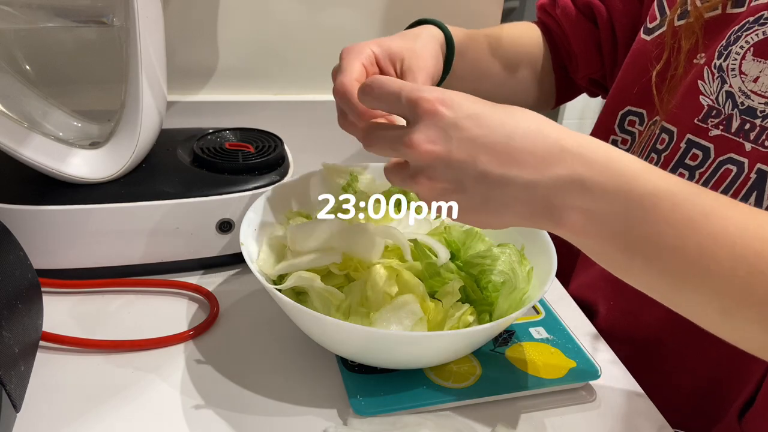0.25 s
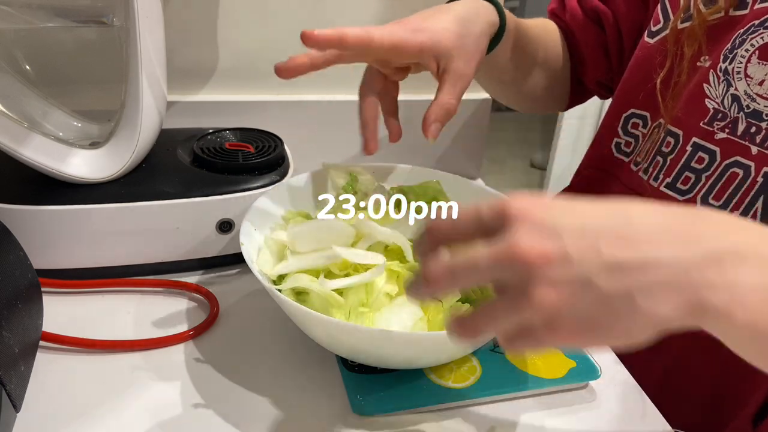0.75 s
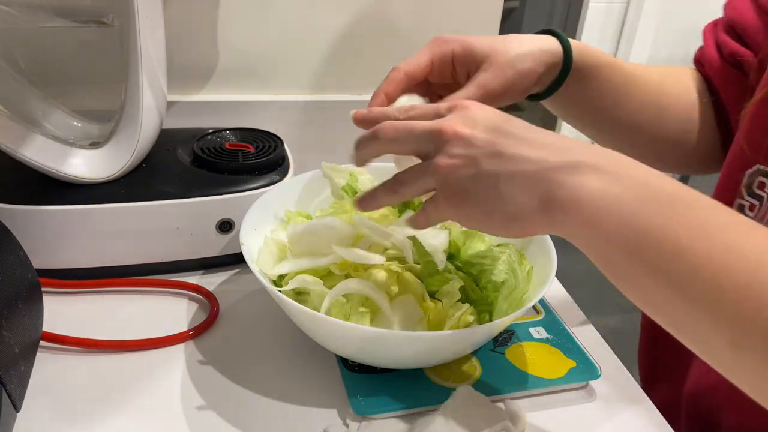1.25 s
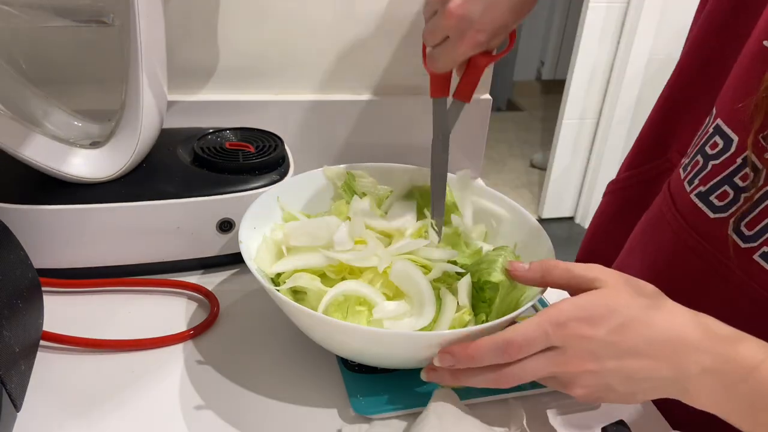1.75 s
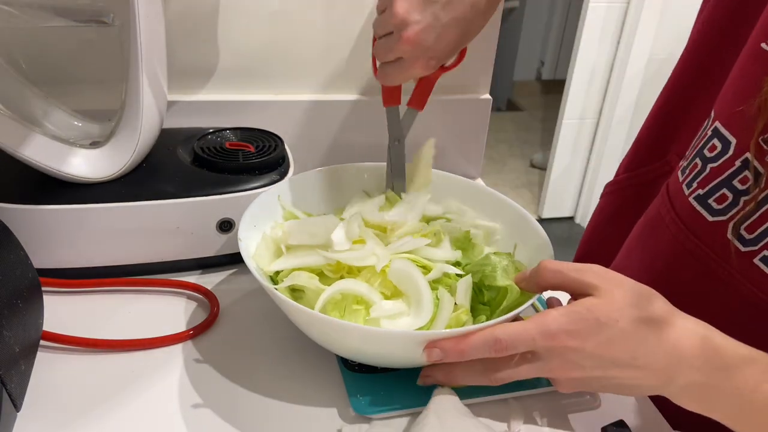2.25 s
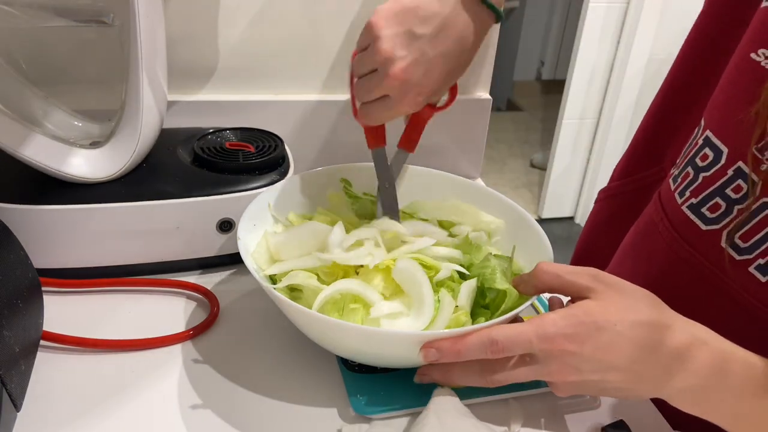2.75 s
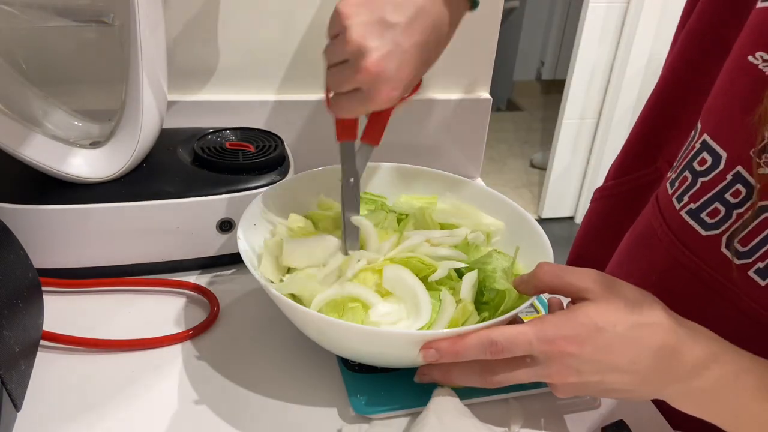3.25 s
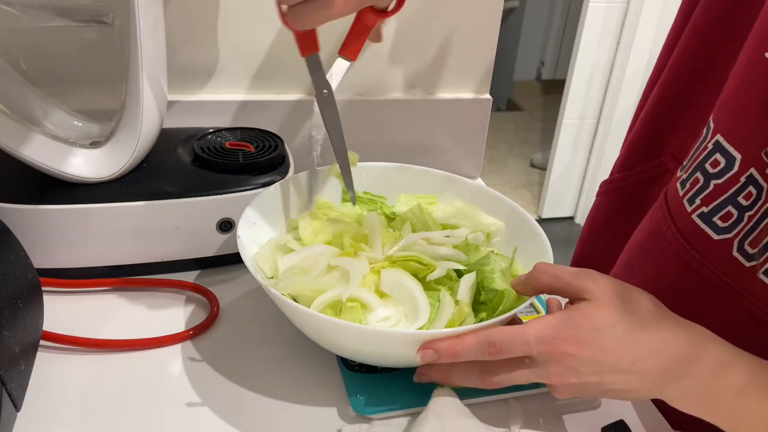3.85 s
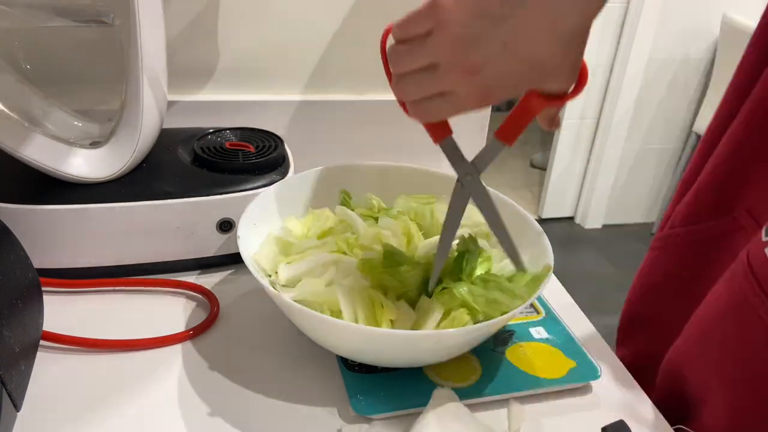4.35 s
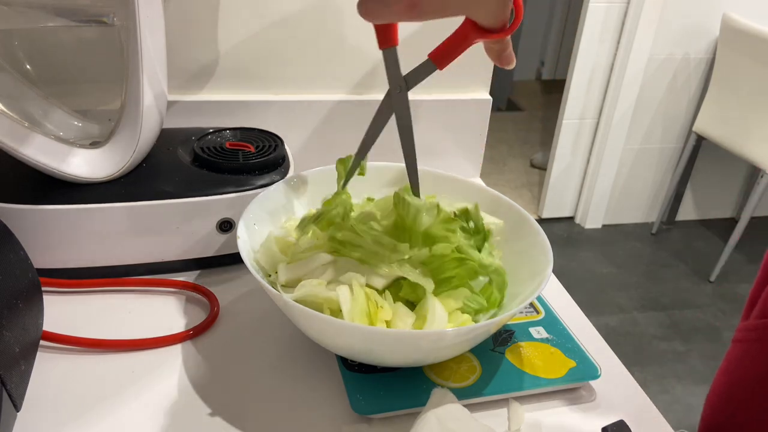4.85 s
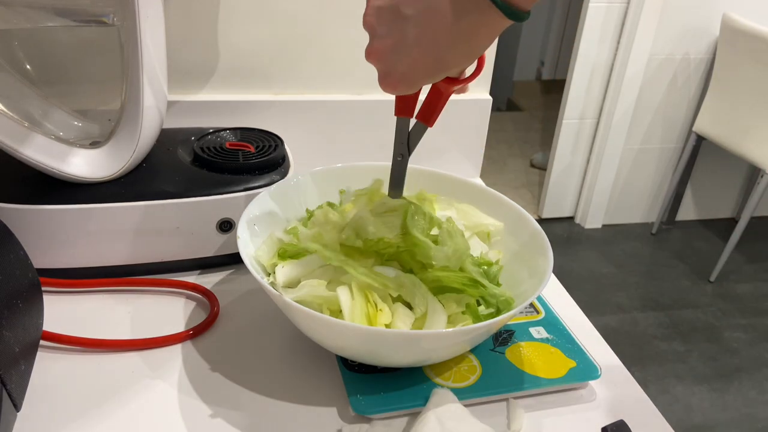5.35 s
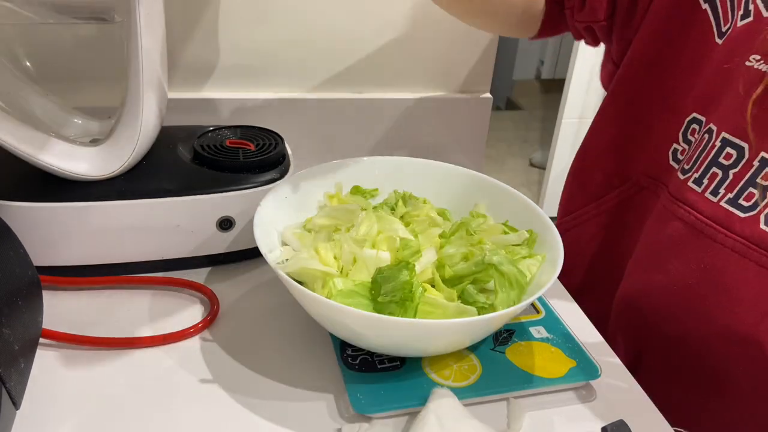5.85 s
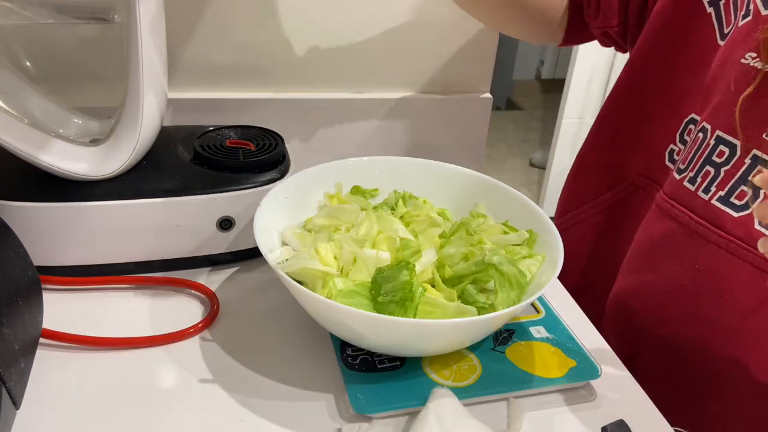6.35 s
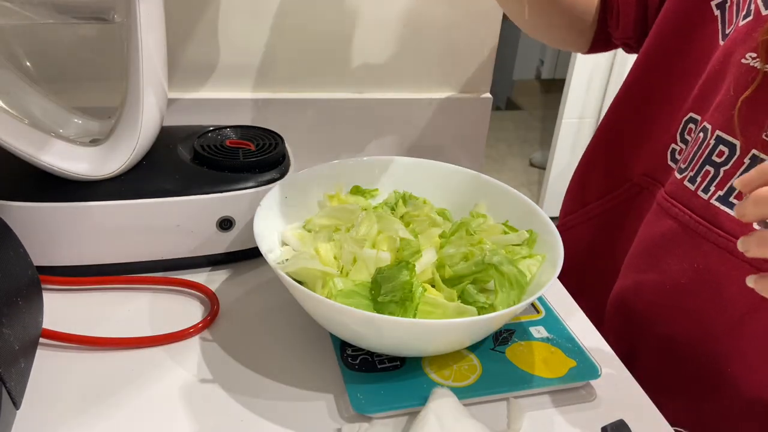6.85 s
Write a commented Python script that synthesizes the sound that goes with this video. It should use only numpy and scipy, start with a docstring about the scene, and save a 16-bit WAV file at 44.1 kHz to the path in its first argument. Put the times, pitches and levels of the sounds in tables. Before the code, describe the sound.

Close to a salad bowl, soft cracks of onion being pulled apart give way to loud scissor snips through crisp lettuce, about two a second, with scraping steel, snapping ribs and a short kitchen echo. A salt shaker then rattles six times, spraying crystals with a thin ring. An extractor fan hums behind everything, and the sound cuts out for an instant four times.

```python
"""A small, hard kitchen: stereo microphones close to a salad bowl, an extractor fan droning behind.
Fingers crack onion layers apart. Scissors chop lettuce in the bowl: cells crunch, ribs break, the
blades rasp and clack shut, and the room rings after every snip. Last, six shakes of salt spray
crystals and ring the shaker. The sound drops out for an instant four times."""
import sys
import numpy as np
from scipy import signal
from scipy.fft import rfft, irfft
from scipy.io import wavfile
from scipy.ndimage import uniform_filter1d, map_coordinates

SR = 44100
rng = np.random.default_rng(int(sys.argv[2]) if len(sys.argv) > 2 else 0)


def wrap_up_sound(samples):
    """Save the sound to the file named by the first command line argument, as 16-bit audio."""
    columns = np.atleast_2d(samples).T
    # keep every value between -1 and 1, then stretch to whole-number steps
    tamed = np.clip(columns, -1, 1)
    steps = np.round(tamed * 32767).astype(np.int16)
    wavfile.write(sys.argv[1], SR, steps)


N = 313110
TIME = np.arange(N) / SR
FFT_SIZE = 2 ** 19
BINS = np.maximum(np.fft.rfftfreq(FFT_SIZE, 1 / SR), 1)


def undb(db):
    """Decibels to gain."""
    return 10 ** (np.asarray(db) / 20)


def unit(x):
    """Scale to rms 1."""
    return x / np.sqrt(np.mean(x ** 2))


def along(points, hz=BINS):
    """Read (freq_hz, value) points on a log-frequency axis."""
    freqs, values = np.transpose(points)
    return np.interp(np.log(hz), np.log(freqs), values)


def response(points=((20, -60), (20000, -60)), peaks=()):
    """Gain of a smooth spectrum with resonances standing on it."""
    power = undb(along(points)) ** 2
    for hz, width, db in peaks:
        power = power + undb(db) ** 2 / (1 + ((BINS - hz) / width) ** 2) ** 2
    return np.sqrt(power)


def shape(x, gain):
    """Colour a sound with a minimum-phase filter, its gain curve scaled to rms 1."""
    cepstrum = irfft(np.log(unit(gain)))[:FFT_SIZE // 2]
    cepstrum[1:] *= 2
    return irfft(rfft(x, FFT_SIZE) * np.exp(rfft(cepstrum, FFT_SIZE)))[..., :x.shape[-1]]


def tilt(x, db_per_octave):
    """Brighten or dull a sound about 4 kHz; flat below 1 kHz."""
    size = 2 * x.shape[-1]
    hz = np.maximum(np.fft.rfftfreq(size, 1 / SR), 1000)
    gain = undb(db_per_octave * np.log2(hz / 4000))
    return irfft(rfft(x, size) * gain)[..., :size // 2]


def add(track, start_s, sound):
    """Mix a short sound into a track."""
    i = max(int(start_s * SR), 0)
    track[..., i:i + sound.shape[-1]] += sound[..., :N - i]


def decay(t, t60_s):
    """Envelope that falls 60 dB in t60_s."""
    return np.exp(-np.log(1000) * t / t60_s)


def gate(age, length_s, attack_s, release_s):
    """Envelope that rises at age 0, holds for a length and dies away."""
    return (1 - np.exp(-np.maximum(age, 0) / attack_s)) * np.exp(-np.maximum(age - length_s, 0) / release_s)


def swell(age, half_s):
    """Soft rise and fall around age 0."""
    return np.exp(-np.minimum(abs(age / half_s), 10) ** 2 / 2)


def surge(age, rise_s=0.01):
    """Envelope of a handful of crystals landing: quick rise to 1, slower fall."""
    u = np.clip(age / rise_s, 0, 20)
    return u * np.exp(1 - u)


def wander(rate):
    """Random course with so many turns a second; spread near 1."""
    return np.interp(TIME * rate, np.arange(N), rng.standard_normal(N))


def grains(rate, spread_db, size=N):
    """Tiny clicks of uneven strength at random moments, about rate a second; rms 1."""
    strengths = undb(spread_db * np.minimum(rng.exponential(size=size), 4))
    return unit(strengths * rng.choice([-1, 1], size) * (rng.random(size) < rate / SR) + 1e-9)


def stereo_grains(rate, spread_db, size=N):
    """Separate clicks for each microphone."""
    return np.array([grains(rate, spread_db, size) for _ in range(2)])


# The extractor's rush of air, behind everything: freq_hz, density_db
FAN_SPECTRUM = [(28, -81.5), (44, -76.5), (100, -90), (170, -102), (280, -83), (410, -78), (600, -82.5),
                (850, -83), (1200, -89.5), (2000, -94), (2800, -97), (3500, -101), (5000, -108),
                (8000, -116), (15000, -124)]
# Resonances of its hood and duct: freq_hz, width_hz, density_db
DUCT_PEAKS = [(65, 10, -77), (102.3, 9.8, -68.5), (113, 12, -65), (135, 11.2, -63), (232.2, 20.1, -53.5),
              (258, 17.4, -58), (307, 16.8, -56.5), (336, 22.8, -59.5), (488.8, 36, -69.5),
              (653.3, 15.6, -74), (763, 28, -79), (863, 25, -76.5), (1124, 48, -81), (1316, 55, -85),
              (1767, 23, -86.5)]
# Its width across the microphones, side minus mid: freq_hz, level_db
FAN_SIDE = [(60, -29), (130, -15), (240, -8.5), (330, -6.5), (410, 7.5), (490, -4.5), (700, 1.5),
            (1100, -1), (2000, -4.5), (8000, 4.5)]
# Left minus right microphone, uneven from standing waves in the room: freq_hz, level_db
FAN_LEAN = [(60, -6), (110, 4.5), (230, 0), (285, 3), (345, 9.5), (378, -3.5), (405, 7.5), (480, -5),
            (510, 0), (560, -2), (1300, -1.5), (4000, 0.5)]
def fan(left_lag_s=.00035, waver_hz=285, waver_db=1.22):
    """Turbulent air drones in the duct and reaches the left microphone slightly late; the drone wavers."""
    gain = response(FAN_SPECTRUM, DUCT_PEAKS) * np.sqrt(SR / 2)
    width, lean = undb(along(FAN_SIDE)), undb(along(FAN_LEAN))
    noise = rfft(rng.standard_normal((2, FFT_SIZE)))
    mid, side = noise * gain * np.array([np.ones_like(width), width]) / np.hypot(1, width)
    late = np.exp(-2j * np.pi * BINS * left_lag_s)
    air = np.array([(mid + side) * lean * late, mid - side]) * np.sqrt(2) / np.hypot(1, lean)
    drone_band = np.exp(-np.log2(BINS / waver_hz) ** 2 / .5)
    steady, drone = irfft(air * (1 - drone_band))[:, :N], irfft(air * drone_band)[:, :N]
    return steady + drone * undb(waver_db * wander(rate=7))


# Decay of the hard room around the microphones: freq_hz, t60_s
ROOM_DECAY = [(300, 0.59), (1500, 0.39), (4000, 0.53), (7000, 0.48), (12000, 0.39), (15000, 0.26)]
def kitchen(build_s=0.00017):
    """Diffuse answer of the room to one click; each band dies at its own rate."""
    t = TIME[:SR * 3 // 4]
    noise = rfft(rng.standard_normal((2, len(t))))
    hz = np.maximum(np.fft.rfftfreq(len(t), 1 / SR), 1)
    tail = 0
    for band_hz, t60_s in ROOM_DECAY:
        band = along([(f, f == band_hz) for f, _ in ROOM_DECAY], hz)
        tail = tail + irfft(noise * band, len(t)) * decay(t, t60_s)
    return unit(tail * (1 - np.exp(-t / build_s))) / np.sqrt(len(t))


def counter(clicks, fall_s, direct, spots=12):
    """Bowl and counter scatter each click; the paths to the microphones change as the hand moves on."""
    t, out = TIME[:SR // 25], 0
    step = (np.arange(N) + rng.integers(SR // 40, size=N)) // (SR // 25)
    spot = rng.integers(spots, size=step.max() + 1)[step]
    for k in range(spots):
        paths = rng.standard_normal((2, len(t))) * np.exp(-t / fall_s)
        paths /= np.linalg.norm(paths, axis=1, keepdims=True)
        paths[0, rng.integers(8, 16)] += direct  # the direct sound reaches the left later
        paths[1, 0] += direct
        out = out + signal.oaconvolve((clicks * (spot == k))[None], paths, axes=1)[:, :N]
    return out / np.hypot(1, direct)


# Modes of the bowl on its board: pitch_hz, level_db, t60_s
BOARD_MODES = [(33, -11.5, .4), (49, -5.5, 0.6), (69.5, 4, 0.53)]
# Nudges of the bowl, alike in both microphones: start_s, level_db
BOWL_BUMPS = [(2.16, -47), (2.8, -47), (3.22, -45), (3.65, -44), (3.999, -49), (4.108, -45), (4.375, -41.5),
              (4.459, -41), (5.101, -44)]
def bowl_bumps():
    """The bumped bowl thuds softly on its board."""
    t, out = TIME[:SR // 3], np.zeros(N)
    thud = sum(undb(db) * np.sin(2 * np.pi * hz * t) * decay(t, t60) for hz, db, t60 in BOARD_MODES)
    for start_s, db in BOWL_BUMPS:
        add(out, start_s, undb(db) * thud * (1 - np.exp(-t / 0.0035)))
    return out


# Onion cracking between the fingers, faint and close: start_s, level_db, tilt_db_per_octave, tear_s
ONION_CRACKS = [(.042, -64, 4.5, 0.0052), (0.106, -60, 8.5, .002), (.135, -74, 9, 0.022),
                (0.194, -70, 8.5, .002), (0.228, -55.5, -1, 0.037), (.385, -66, -6, 0.037),
                (0.467, -48, -12, .002), (0.504, -49.5, -8, .004), (.638, -51.5, -16, .006),
                (0.695, -46.5, -11.5, 0.0011), (.955, -75, 0.5, .125), (1.097, -40, -7, .002),
                (1.131, -33.5, -5, .001), (1.175, -62, 5, .01), (1.306, -49, -2.5, 0.00091),
                (1.339, -56, -4.5, .001), (1.378, -56, -10, .016), (1.443, -58, -4.5, .003),
                (1.538, -44.5, -12, .001)]
# Its crisp tone: freq_hz, density_db
ONION_SPECTRUM = [(800, -11), (2000, -3), (4000, 8.5), (6500, 10.5), (9000, 11.5), (12000, 18.5),
                  (13500, 16.5), (15500, 10)]
def onion():
    """Each crack is a quick run of fine fractures that lasts as long as the layer tears."""
    t, out = TIME[:SR // 6], np.zeros((2, N))
    for start_s, db, brightness, tear_s in ONION_CRACKS:
        tear = gate(t, tear_s, attack_s=0.00046, release_s=0.013)
        fractures = stereo_grains(rate=6200, spread_db=1.5, size=len(t))
        add(out, start_s, undb(db) * tilt(tear * fractures, brightness))
    return shape(out, response(ONION_SPECTRUM))


def shaker_ring(peaks, pitch_ratio):
    """Crystals ring the shaker's resonances, whose pitch wavers as the salt moves inside."""
    rings = shape(stereo_grains(rate=900, spread_db=1.4), response(peaks=peaks))
    position = np.cumsum(pitch_ratio * (1 + 0.0073 * wander(rate=25)))
    return np.array([map_coordinates(ring, [position], mode="mirror") for ring in rings])


# Shakes over the bowl; first_db to low_db are relative to level_db:
# start_s, level_db, pour_s, first_db, bulk_after_s, bulk_db, bright_db, low_db, low_pitch_hz
SALT_SHAKES = [(5.628, -52, 0.095, 7, 0.074, -12, 4, -8, 4600),
               (5.863, -49, 0.095, 1, 0.04, -4, 3, -9, 5050),
               (6.102, -50, 0.13, 11, 0.039, 6.5, 2.5, -2, 5095),
               (6.345, -51, 0.15, 8, 0.053, 12.5, -0.5, 2, 4850),
               (6.585, -51, 0.14, 10, 0.053, 4, -2, -1.5, 5080),
               (6.857, -47.5, 0.13, 1, 0.055, 6.5, -1.5, -2, 5060)]
# Hiss of the crystals from close by: freq_hz, density_db
SALT_SPECTRUM = [(800, -45), (2000, -13), (3500, -10), (6200, -2.5), (8800, -3.5), (11500, 2), (13500, 2),
                 (15500, -2.5)]
# The shaker's bright ring, its low ring and the whistle of the lid's holes: freq_hz, width_hz, density_db
BRIGHT_PEAKS = [(7190, 80, 0), (10200, 99, -9), (11520, 350, -5.5)]
LOW_PEAKS = [(5050, 150, 6), (7940, 220, -2)]
LID_PEAKS = [(13700, 900, 1), (12100, 500, -6)]
def salt(from_s=5.624, last_after_s=0.0926, clump_db=2.5):
    """Each shake throws a first spray, the bulk and a last surge; salt rolls softly in between."""
    shaking = TIME > from_s
    flows, low_ratio, settled = np.zeros((4, N)), np.ones(N), np.zeros(N)
    for start_s, db, pour_s, first_db, bulk_after_s, bulk_db, bright_db, low_db, low_hz in SALT_SHAKES:
        age = TIME - start_s
        slide_back = undb(-9.5) * swell(age + 0.033, half_s=0.019) * shaking  # just before the throw
        pour = gate(age, pour_s, attack_s=.005, release_s=.009) + slide_back
        landing = undb(bulk_db) * surge(age - bulk_after_s) + undb(2.5) * surge(age - last_after_s)
        spray = np.hypot(pour, landing)
        first = undb(first_db) * surge(age)
        bright = undb(bright_db) * np.hypot(pour, landing / 2)
        low = undb(low_db) * np.hypot(undb(-11) * pour, landing)  # woken by a heavy landing
        flows = np.hypot(flows, undb(db) * np.array([spray, first, bright, low]))
        settled += swell(age - .175, half_s=.022)  # the salt rests at the turn of the shake
        low_ratio[age > 0] = low_hz / LOW_PEAKS[0][0]
    spray, first, bright, low = flows * undb(clump_db * wander(rate=97))  # uneven clumps
    rolling = tilt(shaking * grains(rate=4300, spread_db=1.0), db_per_octave=-5.5)
    rolling *= undb(-48 - 7 * settled)
    crystals = counter(rolling + spray * grains(rate=700, spread_db=2.0), fall_s=0.0036, direct=0.93)
    whistle = shape(first * grains(rate=2200, spread_db=-1), response(peaks=LID_PEAKS))
    bright_ring = undb(-2) * bright * shaker_ring(BRIGHT_PEAKS, 1)
    low_ring = undb(-5) * low * shaker_ring(LOW_PEAKS, low_ratio)
    return shape(crystals, response(SALT_SPECTRUM)) + whistle + bright_ring + low_ring


# Coarse salt in the shaker, above the bowl: start_s, level_db, tilt_db_per_octave
GRIT_STRIKES = [(5.631, -36, 9), (5.732, -37, -1), (5.868, -43, 14), (6.113, -36, 13), (6.169, -31, 7),
                (6.358, -35, 12), (6.397, -37, 6), (6.408, -39, -10), (6.519, -40, -6), (6.657, -33, 2),
                (6.819, -45, -8), (6.862, -41, 11), (6.925, -31, -2), (6.966, -40, -5)]
def grit(dying_s=0.0055):
    """Coarse crystals strike the shaker with short, crisp ticks."""
    t, out = TIME[:SR // 25], np.zeros((2, N))
    for start_s, db, brightness in GRIT_STRIKES:
        tick = tilt(stereo_grains(rate=6000, spread_db=1, size=len(t)), brightness)
        add(out, start_s, undb(db) * unit(tick) * np.exp(-t / dying_s))
    return shape(out, response(SALT_SPECTRUM))


def blade_ring(modes, pitch_ratio=1):
    """One ring of the steel blades, every mode with a fresh strength at each microphone."""
    t, ring = TIME[:SR // 3], 0
    for hz, db, t60_s in modes:
        strength = undb(db + 2 * rng.standard_normal((2, 1)))
        cycles = pitch_ratio * hz * t + rng.random((2, 1)) / 2
        ring = ring + strength * decay(t, t60_s) * np.sin(2 * np.pi * cycles)
    return ring * (1 - np.exp(-t / 0.00025))


# Light contacts of the tips, down in the bowl: start_s, tick_db, ring_db
TIP_TOUCHES = [(2.056, -41, -78), (2.588, -47, -63), (3.956, -43, -61), (4.354, -45, -48),
               (4.513, -31.5, -47), (5.304, -36, -80)]
# Modes of the open scissors: pitch_hz, level_db, t60_s
OPEN_MODES = [(2880, 4, 0.2), (2720, 2, .06), (3820, 1, .25), (4600, -3, .18), (7500, 9.5, 0.13),
              (7900, -11, .035), (11300, -12, .08)]
# Scraping steel from close by: freq_hz, density_db
RASP_SPECTRUM = [(1200, -20), (3000, -13), (4500, 8), (6500, 4.5), (9000, 4.5), (11500, 7), (13500, 3.5),
                 (15500, -3)]
def tip_touches(dying_s=0.017):
    """The blade tips touch the bowl or each other: a scratchy tick and a thin ring."""
    t, (ticks, rings) = TIME[:SR // 16], np.zeros((2, 2, N))
    for start_s, tick_db, ring_db in TIP_TOUCHES:
        add(ticks, start_s, undb(tick_db) * np.exp(-t / dying_s) * rng.standard_normal((2, len(t))))
        add(rings, start_s, undb(ring_db) * blade_ring(OPEN_MODES))
    return shape(ticks, response(RASP_SPECTRUM)) + rings


# A knock on the bowl's wall and its bounces: start_s, level_db
TIP_KNOCKS = [(4.4207, -11.5), (4.4462, -22), (4.459, -27)]
# Its hollow resonances: freq_hz, width_hz, density_db
KNOCK_PEAKS = [(2700, 350, 0), (3550, 160, 1), (4260, 300, -6), (7000, 1200, -19)]
# Modes of the blades pressed on the bowl: pitch_hz, level_db, t60_s
PRESSED_MODES = [(2570, 1, .17), (2640, -8, .12), (3500, -3, .13), (3650, -11, .1), (4335, -11, .15),
                 (4575, -2, 0.17)]
def tip_knocks(ring_db=-25):
    """The tips hit the bowl through the leaves with a hard, hollow clack, bounce and ring."""
    t, (clacks, rings) = TIME[:SR // 16], np.zeros((2, 2, N))
    blow = gate(t, 0, attack_s=.0007, release_s=0.0029)
    for start_s, db in TIP_KNOCKS:
        add(clacks, start_s, undb(db) * blow * rng.standard_normal((2, len(t))))
        add(rings, start_s, undb(db + ring_db) * blade_ring(PRESSED_MODES))
    return shape(clacks, response(peaks=KNOCK_PEAKS)) + rings


# Scissor strokes in the bowl, close to the microphones: start_s, slide_s, cut_s, crunch_db, rasp_db
SCISSOR_STROKES = [(2.032, 0.1, 0.074, -32, -38), (2.583, 0.15, 0.066, -34, -36.5),
                   (3.131, 0.057, 0.076, -39, -37.5), (3.543, 0.054, 0.078, -41, -38),
                   (3.956, 0.069, 0.064, -36.5, -40), (4.39, 0.028, 0.133, -40.5, -45.5),
                   (4.97, 0.14, 0.065, -33, -37), (5.303, 0.024, 0.0058, -34, -37.5)]
# Loose leaves shifting or catching between the blades: middle_s, half_length_s, crunch_db, rasp_db
LEAF_RUSTLES = [(2.257, 0.017, -41.5, -50), (2.285, 0.006, -32.5, -30), (2.46, 0.012, -56, -57),
                (2.564, 0.028, -57, -65), (2.94, .008, -63, -56), (3.262, 0.0028, -27.5, -22.5),
                (3.698, 0.00387, -35, -31), (4.364, 0.0069, -38.5, -47), (4.554, 0.007, -42, -39),
                (4.577, 0.0028, -37, -30), (4.742, 0.011, -58, -50.5), (4.793, 0.017, -54, -51),
                (5.266, 0.025, -47, -49.5), (5.541, 0.022, -53.5, -50)]
# Tone of the lettuce's crunch: freq_hz, density_db
LEAF_SPECTRUM = [(400, -53), (750, -18), (1150, 2), (1700, -3.5), (2500, -1.5), (4000, -5), (7000, -11.5),
                 (15500, -33.5)]
def cutting(slide_db=-18, bite_s=0.034, sag_db_per_s=60):
    """The blades slide, bite and cut: leaf cells burst under them while steel rubs on steel."""
    t, crunch, rasp = TIME[:SR // 2], np.zeros(N), np.zeros(N)
    for start_s, slide_s, cut_s, crunch_db, rasp_db in SCISSOR_STROKES:
        grip = np.maximum(np.exp(np.minimum(t - slide_s, 0) / bite_s), undb(slide_db))
        force = grip * gate(t, slide_s + cut_s, attack_s=0.013, release_s=0.015)
        sag_db = sag_db_per_s * np.clip(t - slide_s, 0, cut_s)  # the leaves give way
        add(crunch, start_s, force * undb(crunch_db - sag_db))
        add(rasp, start_s, force * undb(rasp_db))
    for middle_s, half_s, crunch_db, rasp_db in LEAF_RUSTLES:
        shift = swell(TIME - middle_s, half_s)
        crunch += undb(crunch_db) * shift
        rasp += undb(rasp_db) * shift
    cells = counter(crunch * grains(rate=1900, spread_db=2.3), fall_s=0.0025, direct=0.28)
    slips = counter(rasp * grains(rate=1500, spread_db=-3.5), fall_s=0.0026, direct=0.82)
    return shape(cells, response(LEAF_SPECTRUM)) + shape(slips, response(RASP_SPECTRUM))


# Thick lettuce ribs breaking in the bowl: start_s, level_db, centre_hz, spread_octaves, dying_s
RIB_BREAKS = [(2.107, -35, 1800, .7, 0.0032), (2.129, -29, 2270, 0.4, 0.017),
              (2.176, -24.5, 3270, 1.1, 0.005), (2.189, -28, 2980, 0.6, 0.007),
              (2.719, -30.5, 1890, 0.53, 0.0096), (2.777, -25.5, 2480, 1.2, 0.0037),
              (3.175, -30.5, 6050, 1.1, 0.0058), (3.204, -39, 2400, 0.91, 0.0087),
              (3.229, -27.5, 5200, 1.0, .007), (3.586, -32, 5000, 1.3, 0.0065),
              (3.606, -29.5, 3600, 1.5, 0.021), (3.619, -31, 2210, 0.93, 0.0053),
              (4.006, -36, 1900, 0.77, 0.019), (4.051, -25.5, 6450, 1.3, 0.018),
              (4.533, -30.5, 2970, 0.67, 0.01), (5.024, -31, 2100, 1.08, 0.016),
              (5.041, -35, 2100, .6, 0.0055), (5.076, -29.5, 1900, 0.87, 0.009),
              (5.097, -33.5, 2800, 0.65, .025), (5.14, -21, 2820, 0.86, 0.0072),
              (5.3201, -28.5, 3560, 1.4, 0.012)]
def ribs():
    """A thick rib gives way in a short, dense burst around a pitch of its own."""
    t, out = TIME[:SR // 16], np.zeros((2, N))
    hz = np.maximum(np.fft.rfftfreq(len(t), 1 / SR), 1)
    radiation = 1 / np.sqrt(1 + (900 / hz) ** 8)  # a small stalk radiates no bass
    for start_s, db, centre_hz, octaves, dying_s in RIB_BREAKS:
        band = radiation / (1 + (np.log2(hz / centre_hz) / octaves) ** 2 / 2) ** 2
        burst = unit(irfft(rfft(rng.standard_normal((2, len(t)))) * band, len(t)))
        add(out, start_s, undb(db) * burst * gate(t, 0, attack_s=.0007, release_s=dying_s))
    return out


# The scissors shutting, close and loud: start_s, level_db, tilt_db_per_octave, echo_db, close_s, pitch_hz
SCISSOR_SNIPS = [(1.657, -20.5, 9, 24.5, .0018, 2700), (2.2896, -18.5, 2, 17.5, .001, 2644),
                 (2.7950, -16, 1.5, 16, 0.0018, 2570), (3.2660, -17, 4.5, 19, .0018, 2655),
                 (3.7009, -15.5, 2, 17, 0.0017, 2720), (4.0851, -15.5, 1, 17, .001, 2574),
                 (4.579, -18, 2.5, 16, .0017, 2700)]
# Modes of the closed scissors: pitch_hz, level_db, t60_s
SHUT_MODES = [(2687, 10.5, 0.09), (2645, -10.5, 0.36), (2810, -3.5, 0.27), (4900, -2.5, 0.19),
              (5340, -3, 0.2), (6630, -0.5, 0.25), (11930, 2, 0.013)]
# The direct clack at the microphones, and its ring back from the walls: freq_hz, density_db
CLACK_SPECTRUM = [(400, -11), (720, -25), (1150, -6.5), (2000, -1), (2650, 1), (3500, -6), (6000, 0.5),
                  (9000, -3.5), (11300, -1.5), (12500, -13.5), (13800, -15), (15500, -28)]
ECHO_SPECTRUM = [(400, -63), (1000, -8.5), (2000, -2.5), (2650, 9), (3400, -4), (5000, 5), (6200, 9),
                 (7500, 2), (9000, 7), (11500, -3), (12700, -3), (14000, -48)]
def snips(from_s=1.682, steel_db=-21.5):
    """The handles meet, chatter and slam home; the steel rings on into the room, never twice alike."""
    t, (clacks, rings, echoes) = TIME[:SR // 10], np.zeros((3, 2, N))
    for start_s, db, brightness, echo_db, close_s, pitch_hz in SCISSOR_SNIPS:
        from_slam_s = abs(t - close_s)
        chatter = np.exp(-from_slam_s / .002)
        slam = np.exp(-from_slam_s / .001)
        joint_rattle = undb(-2) * np.exp(-from_slam_s / .0078)
        blow = np.where(t < close_s, chatter, slam + joint_rattle)
        add(clacks, start_s, undb(db) * tilt(blow * rng.standard_normal((2, len(t))), brightness))
        steel = blade_ring(SHUT_MODES, pitch_hz / SHUT_MODES[0][0])
        add(rings, start_s + close_s, undb(db + steel_db) * steel)
        add(echoes, start_s, undb(db + echo_db) * kitchen())
    out = shape(clacks, response(CLACK_SPECTRUM)) + rings + shape(echoes, response(ECHO_SPECTRUM))
    return out * (TIME > from_s)  # only the ringing tail of the first snip is heard


def scene(lean_db=0.97):
    """The work at the bowl, a little left of the microphones, in the room and over the fan."""
    chopping = onion() + cutting() + ribs() + tip_knocks() + tip_touches()
    seasoning = salt() + grit()
    work = chopping + seasoning + snips()
    into_room = undb(-9) * chopping + undb(-15) * seasoning
    room = signal.fftconvolve(into_room, kitchen(), axes=1)[:, :N]
    return (work + room) * undb([[lean_db], [-lean_db]]) + bowl_bumps() + fan()


def narrow_treble(x, from_hz=7380, over_hz=1200, left_lag_s=.000238, in_phase_hz=11130):
    """The top of both channels is nearly the same sound, slightly late on the left."""
    left, right = rfft(x, FFT_SIZE)
    shared = np.clip((BINS - from_hz) / over_hz, 0, .93)
    late = right * np.exp(-2j * np.pi * (BINS - in_phase_hz) * left_lag_s)
    left = np.sqrt(1 - shared) * left + np.sqrt(shared) * late
    return irfft(np.array([left, right]))[:, :N]


# Instants of silence in both channels: start_s, end_s
DROPOUTS = [(.854, .862), (1.674, 1.682), (4.344, 4.353), (5.614, 5.624)]
def record(dry, low_hz=36, top_hz=16000):
    """The treble is narrowed and the sound drops out briefly; deep rumble and the very top are cut."""
    live = np.ones(N)
    for start_s, end_s in DROPOUTS:
        live[int(start_s * SR):int(end_s * SR)] = 0
    low_cut = signal.butter(6, low_hz, "high", fs=SR, output="sos")
    top_cut = signal.ellip(10, .2, 80, top_hz, fs=SR, output="sos")
    thinned = signal.sosfilt(low_cut, narrow_treble(dry))
    return signal.sosfilt(top_cut, thinned * uniform_filter1d(live, size=64))


dry = scene()
out = record(dry)
wrap_up_sound(out)
```